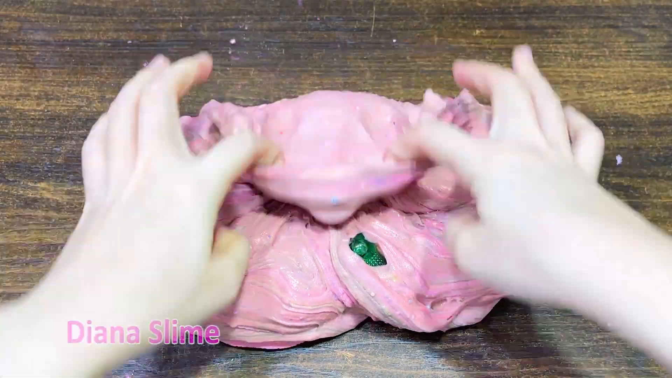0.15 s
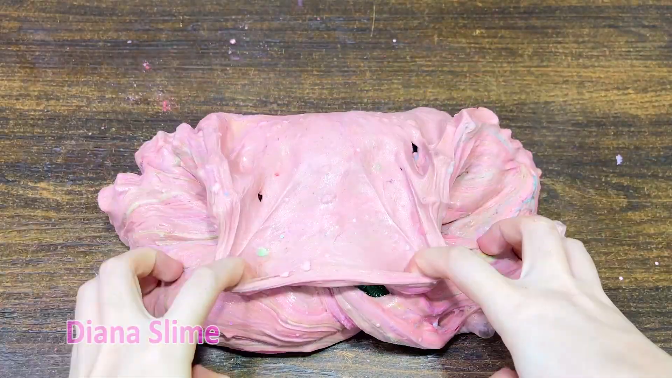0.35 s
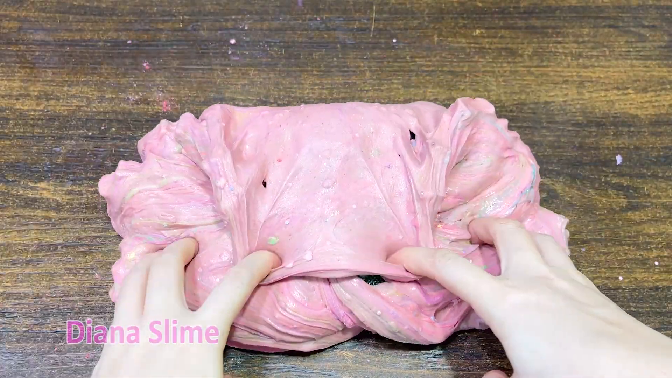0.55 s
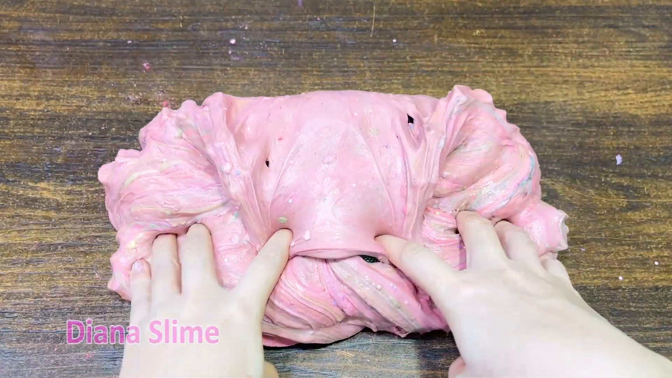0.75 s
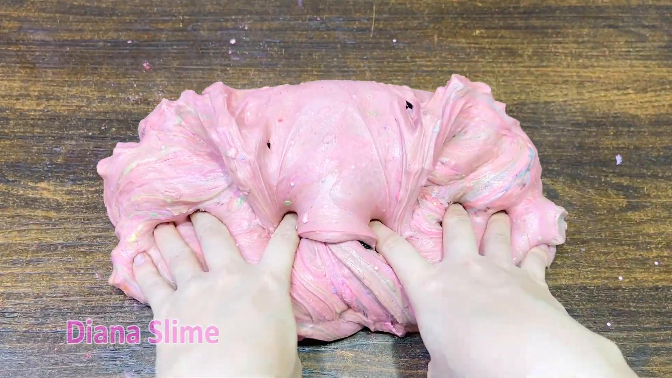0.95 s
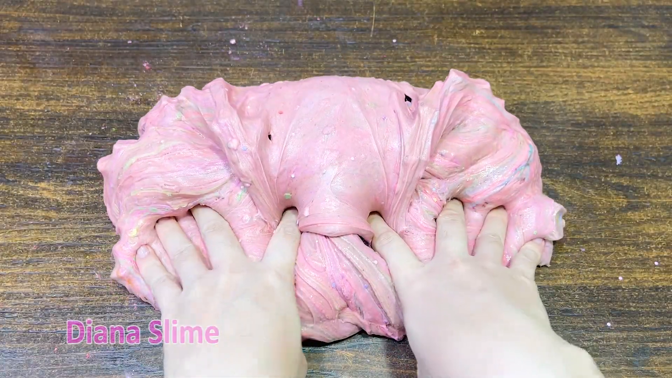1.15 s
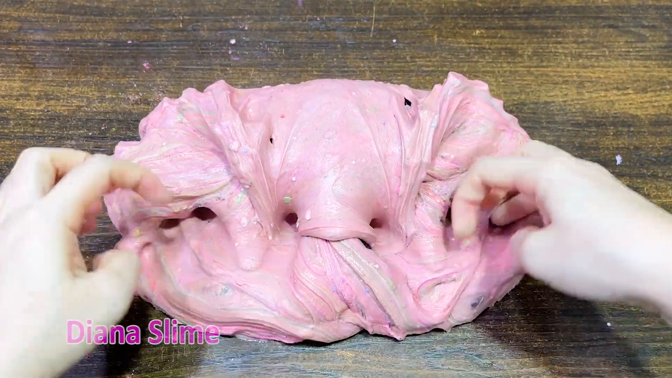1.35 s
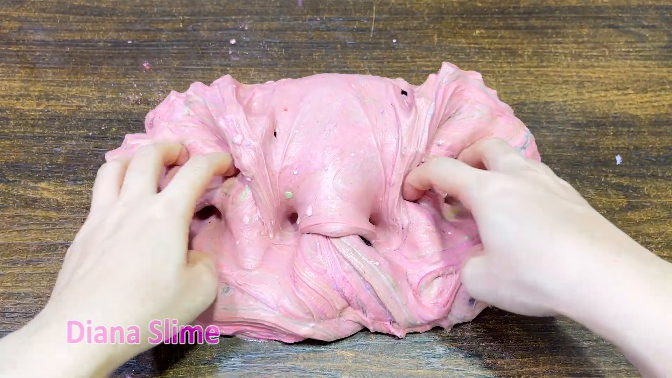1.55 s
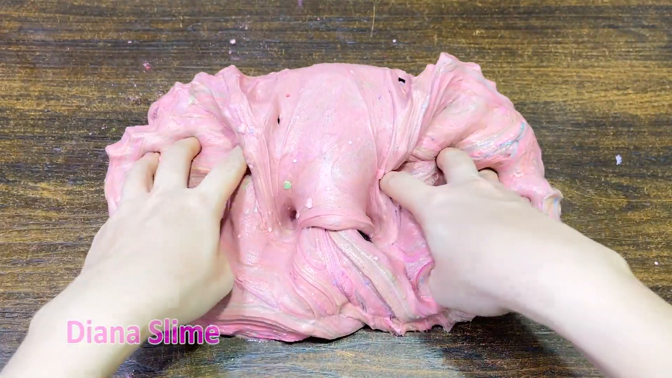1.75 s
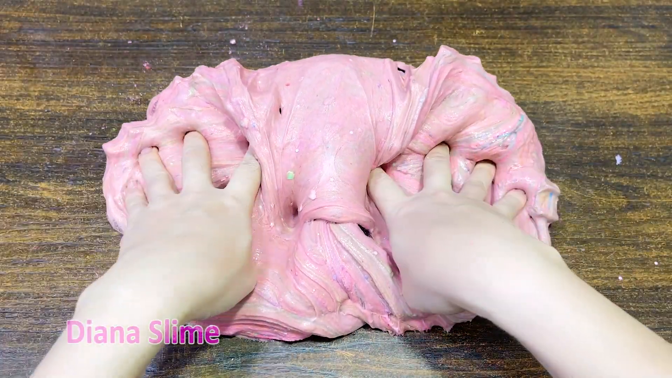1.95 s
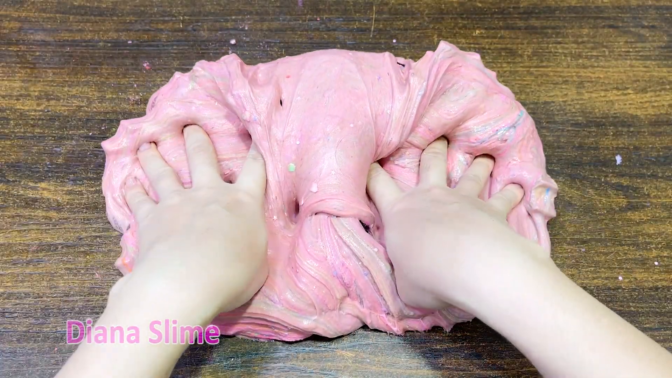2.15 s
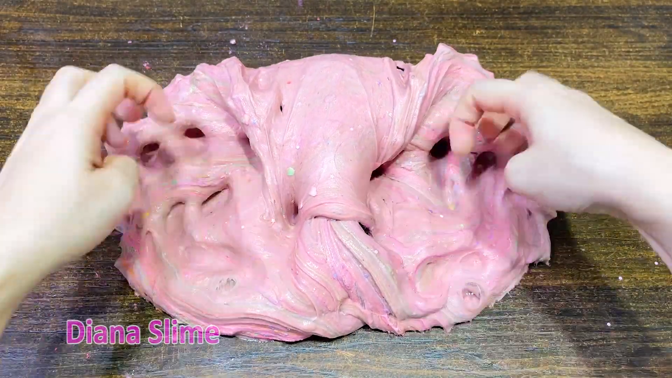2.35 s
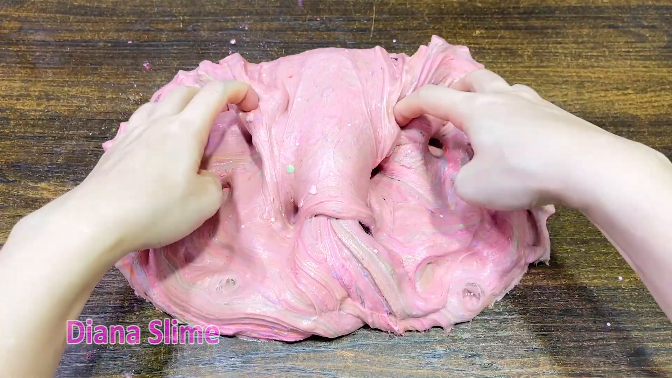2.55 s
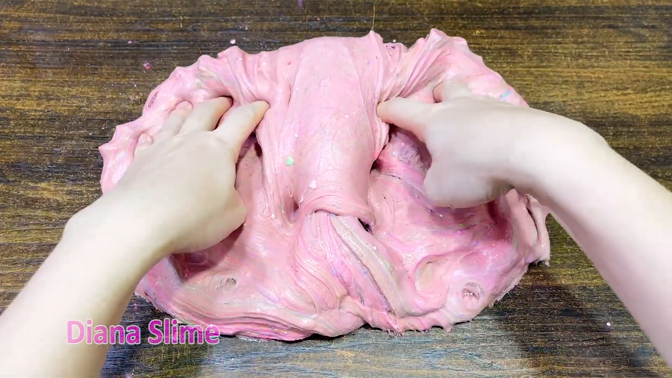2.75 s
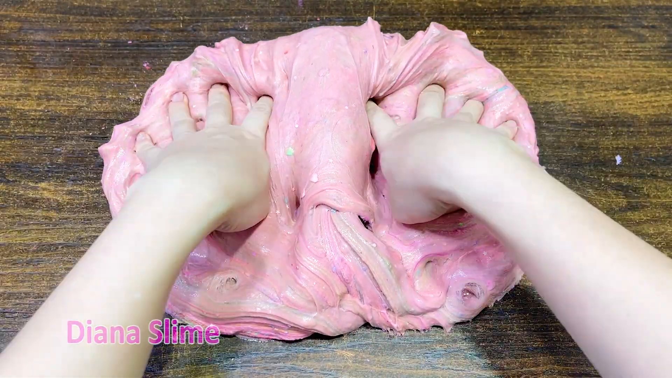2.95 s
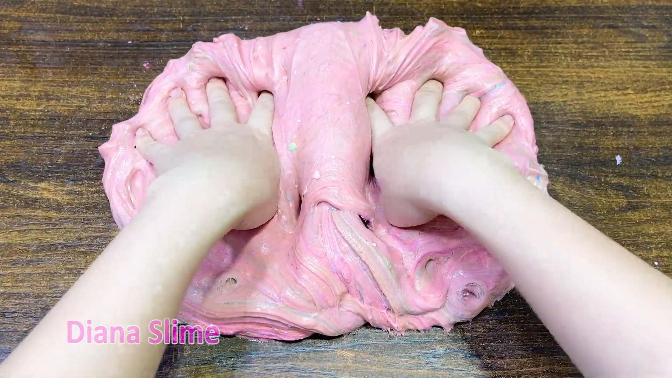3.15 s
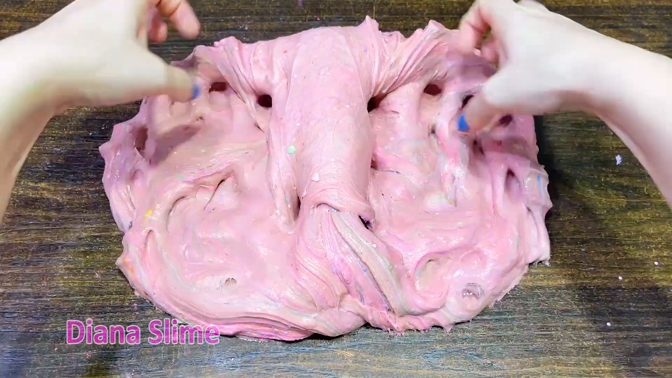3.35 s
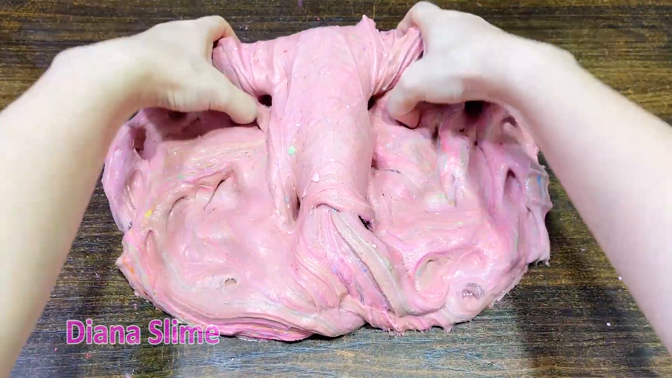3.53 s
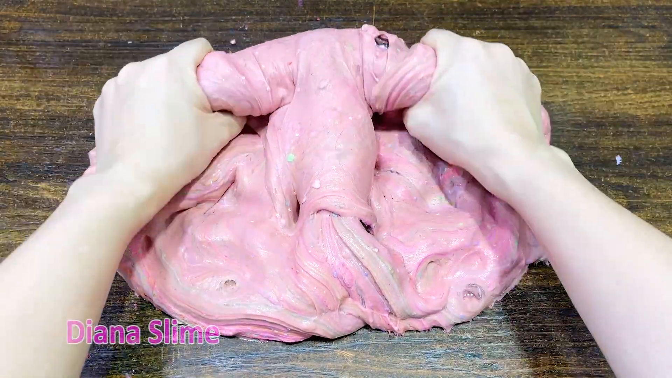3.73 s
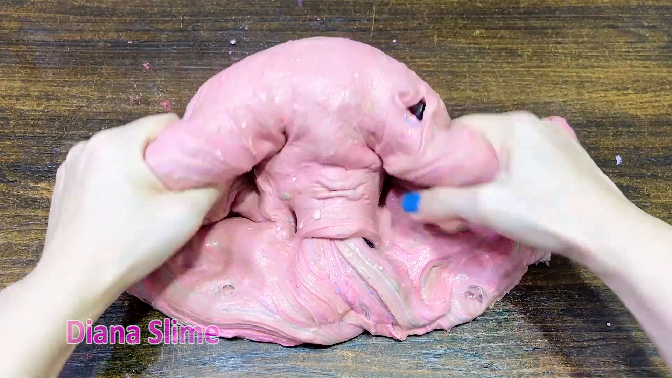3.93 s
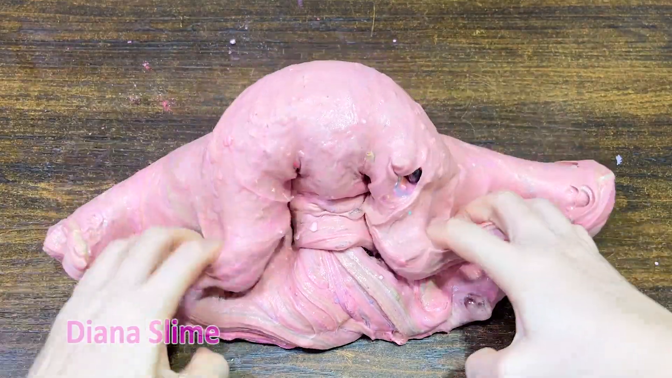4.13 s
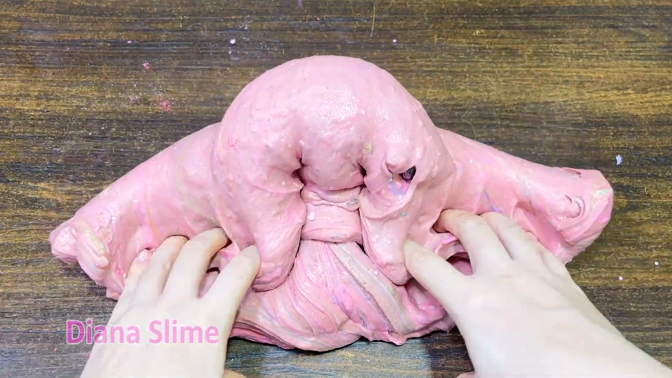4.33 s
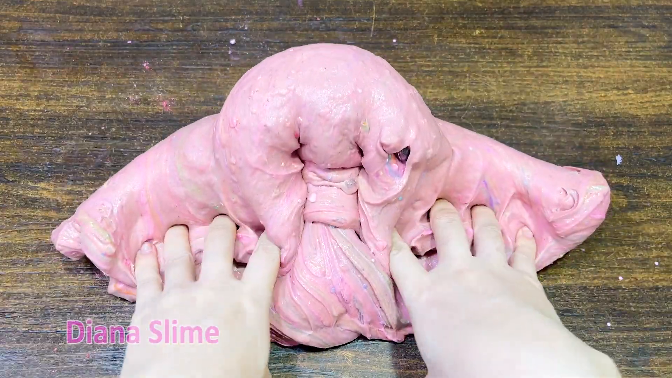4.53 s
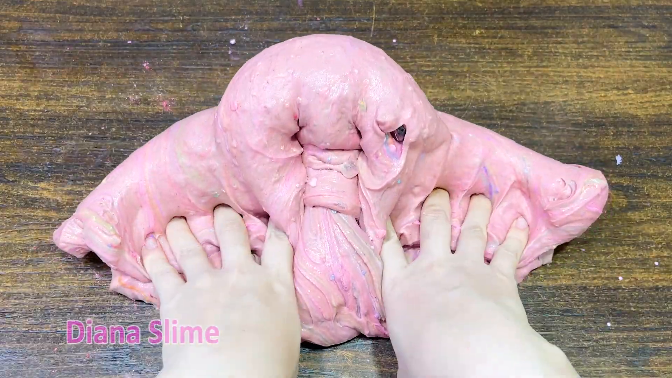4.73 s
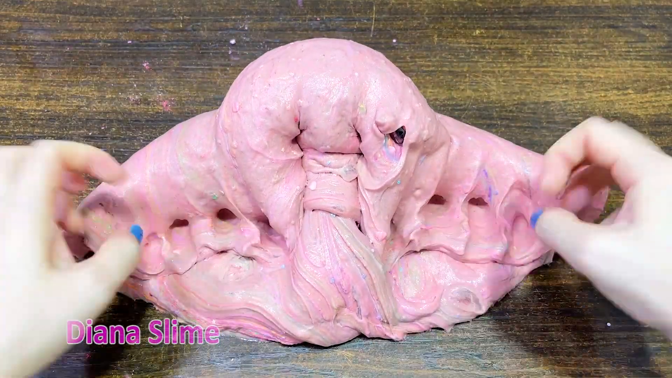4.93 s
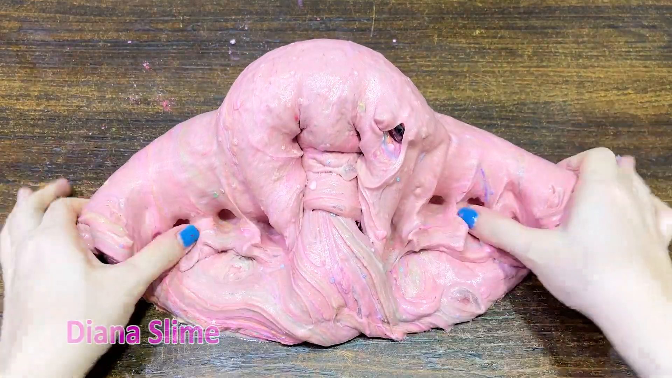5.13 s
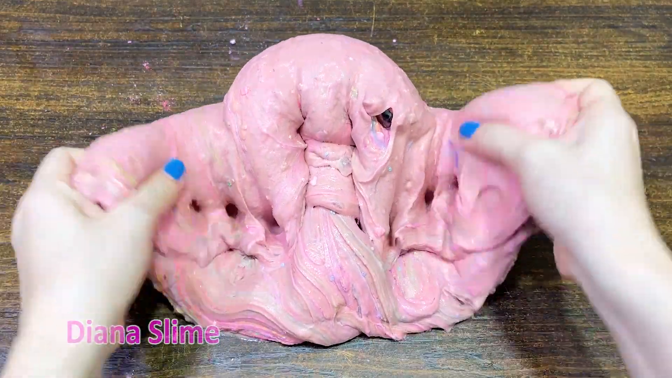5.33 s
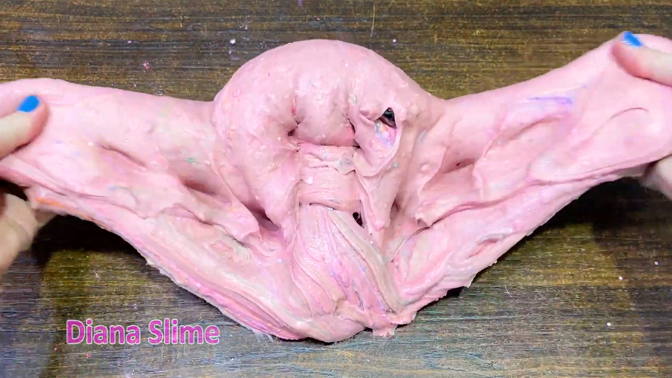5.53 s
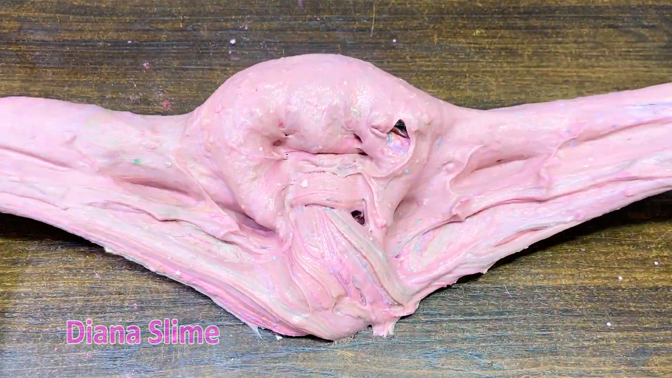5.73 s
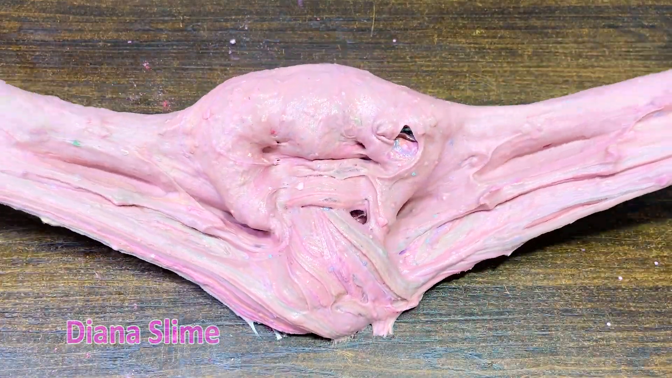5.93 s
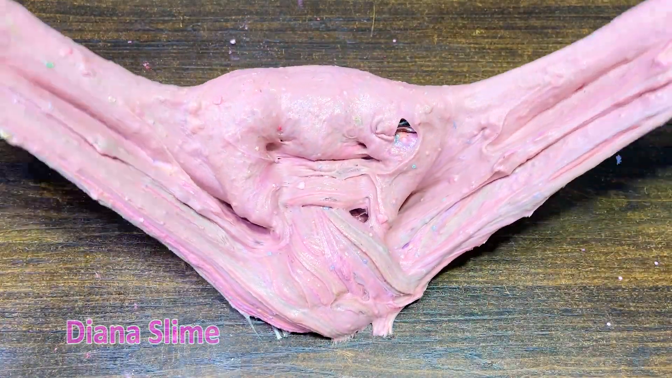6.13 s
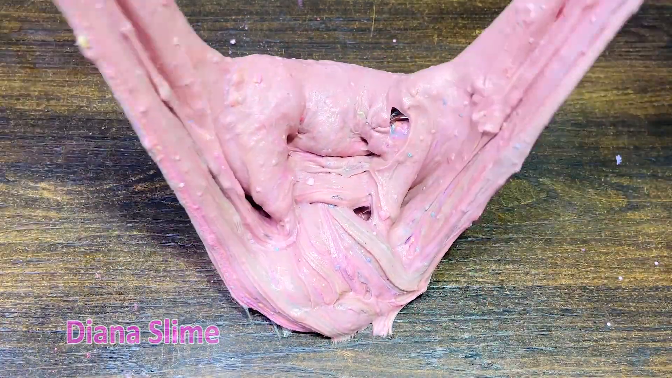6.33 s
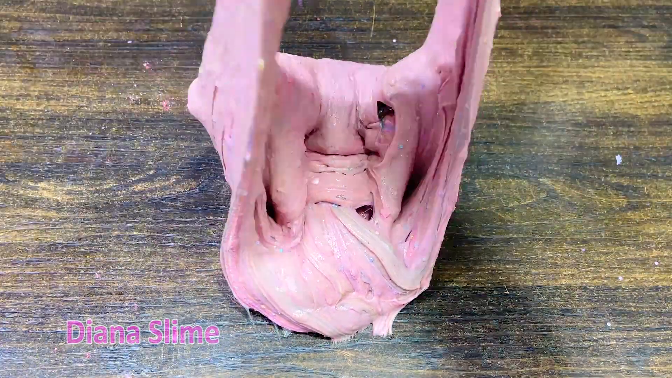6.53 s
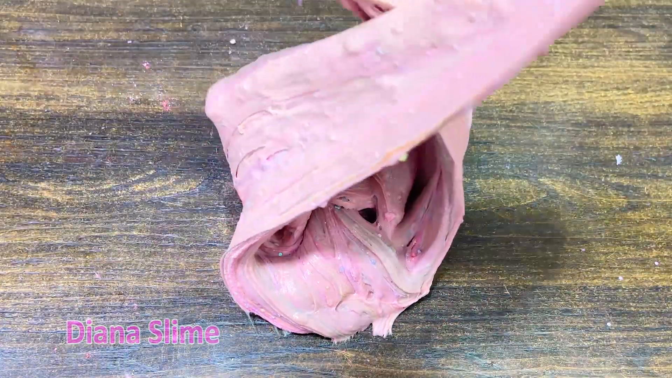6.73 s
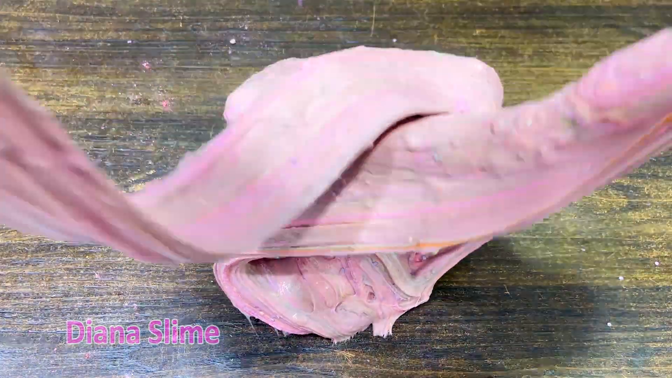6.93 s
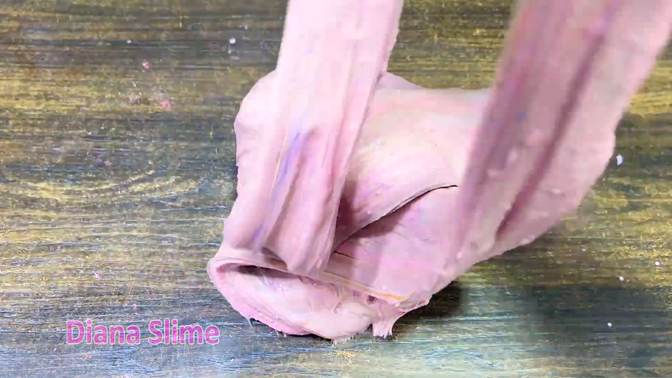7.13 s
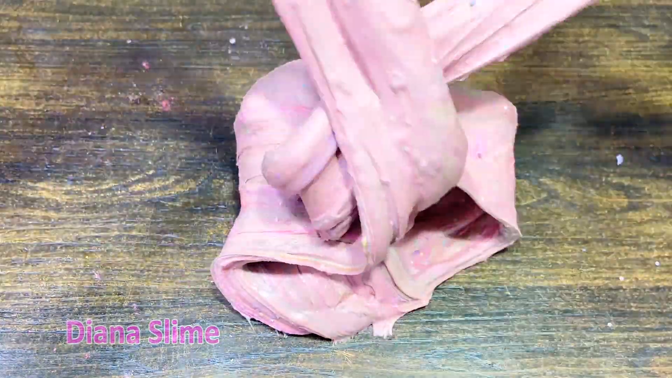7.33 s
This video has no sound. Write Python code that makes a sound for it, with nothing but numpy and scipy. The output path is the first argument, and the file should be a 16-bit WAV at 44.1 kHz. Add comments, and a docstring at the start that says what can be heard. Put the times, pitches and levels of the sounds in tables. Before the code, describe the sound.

Close, crisp slime sounds: bursts of sticky crackling and bubble pops as fingers press and pull, quieter squishing between, over a faint room hum.

```python
"""Two hands press, fold and stretch a soft sticky mass on a wooden table in a small quiet room.
From the start thin films tear in a fine crackle of short rings, single films snap as puffs of noise and
air pockets pop as decaying tones; three stronger bursts between 1.3 and 3.5 s and one at 5 s add the gulps
of closing finger holes and thuds of the table, as noise bands. Longer strains crackle near 4.1 and 5.5 s,
then weaken, and a low-mid rush swells at 7.3 s. A fan-like hum, coloured noise, lies below throughout."""
import sys
import numpy as np
from scipy import signal
from scipy.fft import rfft, irfft, next_fast_len
from scipy.io import wavfile

SR = 44100
rng = np.random.default_rng(int(sys.argv[2]) if len(sys.argv) > 2 else 0)


def gain_from_db(level_db):
    """Convert decibel levels to linear amplitude factors (20 dB per decade)."""
    decades = np.asarray(level_db, float) / 20
    return 10 ** decades


def generate_wav(signal):
    """Clip the signal to [-1, 1] and save it as 16-bit WAV at the path in sys.argv[1]."""
    frames = np.transpose(np.atleast_2d(signal))
    scaled = np.clip(frames, -1, 1) * 32767
    pcm = np.round(scaled).astype(np.int16)
    wavfile.write(sys.argv[1], SR, pcm)


N = 329868


def rms_one(x):
    """Normalisation: scale to unit root mean square."""
    return x / np.sqrt(np.mean(x ** 2) + 1e-20)


def in_time(rows):
    """Linear interpolation: the value of each column at every sample."""
    s, *columns = np.transpose(rows)
    return [np.interp(np.arange(N) / SR, s, column) for column in columns]


def shaped(x, points):
    """Linear filtering: gains in dB, interpolated on a log frequency axis, multiply the spectrum."""
    hz, db = np.transpose(points)
    grid = np.maximum(np.fft.rfftfreq(N, 1 / SR), 1)
    gain_db = np.interp(np.log(grid), np.log(hz), db, -90, -90)
    return irfft(rfft(x) * gain_from_db(gain_db), N)


def drift(corner_hz):
    """Low-pass random process: two equal poles leave slow fluctuations of unit spread."""
    hop = 40  # samples between computed values
    warm_up = 2000
    r = np.exp(-2 * np.pi * corner_hz * hop / SR)
    white = rng.standard_normal(N // hop + warm_up + 2)
    slow = signal.lfilter([1], [1, -2 * r, r * r], white)[warm_up:]
    return np.interp(np.arange(N) / hop, np.arange(len(slow)), rms_one(slow))


def resonator(x, hz, r, gain):
    """Damped resonance: a pole pair of radius r rings at hz, with zeros at both ends of the spectrum."""
    w = 2 * np.pi * hz / SR
    return signal.lfilter([gain, 0, -gain], [1, -2 * r * np.cos(w), r * r], x)


def band_noise(low_hz, high_hz, alike):
    """Partial coherence: mid and side noise in one band, weighted by likeness, with rms 1."""
    sos = signal.butter(2, [low_hz, high_hz], "band", fs=SR, output="sos")
    mid, side = signal.sosfilt(sos, rng.standard_normal((2, N)))
    return rms_one(np.sqrt(1 + alike) * mid + np.sqrt(1 - alike) * side * [[1], [-1]])


def high_pass(x, order, hz):
    """High-pass filtering: a maximally flat response removes the bass."""
    return signal.sosfilt(signal.butter(order, hz, "high", fs=SR, output="sos"), x)


def humps(s, hold_s, db, rise_db_per_s, fall_db_per_s, under_db, swell_db_per_s=0.0):
    """Power addition: events that rise, swell through a hold and fall, straight in dB, add to a level."""
    power, t = 0, np.arange(0, N / SR + .001, .001)
    for start, hold, top in np.broadcast(s, hold_s, db):
        rise = rise_db_per_s * np.maximum(start - t, 0)
        swell = swell_db_per_s * np.clip(start + hold - t, 0, hold)
        fall = fall_db_per_s * np.maximum(t - start - hold, 0)
        power = power + gain_from_db(2 * np.maximum(top - rise - fall - swell, -150))
    return 10 * np.log10(gain_from_db(2 * under_db) + np.interp(np.arange(N) / SR, t, power))


def add(out, s, db, shape):
    """Superposition: place a shape so that its peak height is db."""
    i = int(s * SR)
    out[i:i + len(shape)] += (gain_from_db(db) * shape / np.abs(shape).max())[:N - i]


# typical pitch of the air pockets under the fingers: [t/s, f/Hz]
POCKET_PITCH = [(0, 2200), (.15, 1498), (.35, 3495), (.62, 2170), (1.1, 3826), (1.65, 2000), (2.2, 2594),
                (2.44, 1835), (3.0, 3190), (3.4, 3500), (3.7, 2000), (4.1, 1495), (4.4, 3427), (5.0, 3020),
                (5.35, 1894), (5.7, 3250), (6.5, 2977), (7.48, 2870)]


def crackle(db, colour, pitches, per_s, spread_db, clump_db, cycles, lean_db=0):
    """Shot noise: random tiny tears ring briefly at their own pitches, denser as peeling gets harder.

    Each pitch range comes and goes in patches; lean_db makes those near the pocket size stand out.
    """
    # per_s holds at -63 dB, before clumping and the limits
    rate = np.clip(per_s * gain_from_db(db + 63.0 + clump_db * drift(25)), 3000, 14000)
    sizes = gain_from_db(spread_db * np.minimum(rng.exponential(1, (2, N)), 5)) * rng.choice([-1, 1], (2, N))
    # the root keeps the mean power independent of the rate
    tears = sizes * (rng.random((2, N)) < rate / SR) / np.sqrt(rate)
    dealt = rng.integers(0, len(pitches), (2, N))
    pocket_hz, = in_time(POCKET_PITCH)
    rings = 0
    for k, hz in enumerate(pitches):
        r = np.exp(-hz / (cycles * SR))
        nearness = np.exp(-(np.log2(hz / pocket_hz) / 0.36) ** 2)  # width in octaves
        patch = gain_from_db(2.8 * drift(13.0) + lean_db * nearness)
        # a tiny offset keeps the filter clear of denormal numbers
        rings = rings + resonator(tears * (dealt == k) * patch + 1e-18, hz, r, 1 - r)
    near, apart = shaped(rings, colour)
    # tears far to the sides reach the ports unlike, and duller
    apart = signal.sosfilt(signal.butter(4, 9500, fs=SR, output="sos"), apart)
    return gain_from_db(db + 1.1 * drift(32)) * rms_one(near + 0.49 * apart * [[1], [-1]])


# colour of the fine tearing: [f/Hz, gain level/dB]
FINE_COLOUR = [(3500, -5.5), (5500, -3.5), (8000, -5.5), (10800, -2), (13800, 5), (15300, 4.5),
               (15950, -12.5)]
# colour of the wet body of the tearing: [f/Hz, gain level/dB]
BODY_COLOUR = [(500, -10.5), (900, -4), (1200, -10.5), (1600, -0.5), (2500, -4.5), (3800, -1), (6000, -24)]
# fingers pulled out of the mass: [t/s of full tearing, hold t/s,
# fine crackle level/dB and wet body level/dB, both at the end of the hold]
FINGER_PULLS = [(.1, .055, -27.5, -28.5), (0.179, .04, -36, -42.5), (1.367, 0.084, -27, -31),
                (2.375, 0.064, -29.5, -32), (2.399, .01, -25.5, -39), (3.366, 0.03, -23, -25.5),
                (4.948, .04, -37, -42), (5.009, 0.005, -19, -24.5)]
# slow strain while the mass is pressed, folded and stretched:
# [t/s, fine crackle level/dB, wet body level/dB]
SLOW_STRAIN = [(0.0, -49, -63), (.27, -55, -61), (.36, -49.5, -54.5), (.6, -61, -75.5), (.83, -72.5, -83),
               (1.08, -60, -66.5), (1.25, -74.5, -87.5), (1.68, -65, -63), (1.81, -65, -79),
               (2.03, -62, -62.5), (2.3, -77, -80), (2.66, -64, -68), (3.06, -61, -73.5),
               (3.21, -79.5, -79), (3.616, -67, -71), (3.654, -49.5, -49.5), (4.04, -39, -47),
               (4.11, -32.5, -43), (4.24, -48.5, -58), (4.49, -67.5, -75), (4.72, -60, -74.5),
               (4.89, -81, -91), (5.23, -64, -60.5), (5.25, -49, -47), (5.507, -32, -39.5),
               (5.545, -33.5, -43.5), (5.62, -50, -58.5), (5.84, -49, -56.5), (6.2, -55, -63),
               (6.355, -49, -66.5), (6.44, -55.5, -64.5), (6.507, -43.5, -53), (6.617, -73.5, -89.5),
               (7.33, -79, -81.5), (7.39, -71, -66.5), (7.48, -60.5, -68.5)]


def tearing():
    """Adhesive failure: pulls and slow strain set the levels of a fine and a wet crackle."""
    strain_fine_db, strain_body_db = in_time(SLOW_STRAIN)
    s, hold_s, pull_fine_db, pull_body_db = np.transpose(FINGER_PULLS)
    fine_db = humps(s, hold_s, pull_fine_db, rise_db_per_s=602.5, fall_db_per_s=336.5,
                    under_db=strain_fine_db, swell_db_per_s=59)
    body_db = humps(s, hold_s, pull_body_db, rise_db_per_s=603, fall_db_per_s=341,
                    under_db=strain_body_db, swell_db_per_s=132.5)
    fine = crackle(fine_db, FINE_COLOUR, np.geomspace(4000, 15500, num=9),
                   per_s=2200, spread_db=3.0, clump_db=3.5, cycles=1.8)
    body = crackle(body_db, BODY_COLOUR, np.geomspace(600, 5500, num=12),
                   per_s=5300, spread_db=3.0, clump_db=5.0, cycles=1.6, lean_db=4.5)
    return fine + body


# films snapping: [t/s, peak level/dB, centre f/Hz of the hiss]
FILM_SNAPS = [(0.021, -33.5, 10100), (.0964, -11.5, 14700), (.188, -19, 6960), (.202, -22.5, 7600),
              (.216, -22, 7260), (.2971, -35, 11600), (0.3152, -27, 12300), (0.4131, -21.5, 10200),
              (0.5684, -37, 11700), (.749, -30.5, 6450), (1.0203, -37.5, 11900), (1.3682, -25, 14700),
              (1.4389, -1.5, 12300), (1.4436, -9.5, 11600), (1.4638, -18, 14910), (1.7312, -36, 11700),
              (1.8237, -21, 7000), (1.9316, -20.5, 12200), (2.0248, -31.5, 7950), (2.059, -35, 15200),
              (2.1134, -34, 11600), (2.1958, -28, 8900), (2.3867, -6, 12600), (2.4055, -7.5, 11800),
              (2.435, -16, 14500), (2.5814, -43, 5920), (2.6039, -30.5, 14200), (2.6424, -38, 6100),
              (2.6648, -27.5, 14300), (2.74, -34.5, 14800), (2.868, -37, 14200), (2.9107, -22.5, 11800),
              (3.0304, -28, 14500), (3.062, -31.5, 11700), (3.3772, -12, 14500), (3.6426, -33, 10500),
              (3.6543, -30, 5470), (3.7853, -28.5, 9660), (3.8275, -20.5, 9000), (3.8361, -20.5, 11600),
              (4.2147, -21.5, 4830), (4.2664, -18, 8000), (4.4153, -31.5, 5000), (4.531, -43, 14500),
              (4.659, -28.5, 14200), (4.781, -32.5, 14300), (4.9679, -20, 7700), (5.005, -6, 10000),
              (5.0136, -7, 10800), (5.1985, -38, 9900), (5.2393, -33, 5100), (5.2544, -22, 11600),
              (5.3134, -24.5, 11600), (5.3401, -20, 14800), (5.437, -22, 11600), (5.4955, -11.5, 14100),
              (5.5045, -4.5, 15100), (5.5428, -18, 11500), (5.671, -28.5, 11700), (5.8344, -17, 8830),
              (5.856, -27, 7140), (5.955, -35, 6000), (6.247, -37, 7240), (6.971, -42.5, 14320),
              (7.125, -34.5, 14850)]


def snaps():
    """Impulsive rupture: a bursting film gives a short bright puff of noise, longer when louder."""
    out, t = np.zeros(N), np.arange(1200) / SR
    puffs = rng.standard_normal((len(FILM_SNAPS), len(t)))
    r = np.exp(-np.pi * 1900 / SR)  # bandwidth 1900 Hz
    for (s, db, hz), puff in zip(FILM_SNAPS, puffs):
        tail_s = .00042 + .0022 * gain_from_db(.9 * db)
        puff = puff * (1 - np.exp(-t / .0003)) ** 2 * np.exp(-t / tail_s)
        hiss = resonator(puff, hz, r, (1 - r * r) / 2)
        broad = signal.lfilter([1, -1], [1, -.2], puff)
        add(out, s, db, hiss + .22 * broad)
    return out


def cavities(rows, swell, cycles, rise, rough):
    """Cavity resonance: enclosed air swells, rings down unevenly and shifts in pitch as it closes.

    swell and cycles are time constants in periods; rise bends the pitch and rough jitters the phase.
    """
    out, wobbles = np.zeros(N), rng.standard_normal((len(rows), 42))
    for (s, db, hz), wobble in zip(rows, wobbles):
        turns = np.arange(int(20 / hz * SR)) * hz / SR
        body = (1 - np.exp(-turns / swell)) ** 2 * np.exp(-turns / cycles)
        jitter = rough * np.interp(2 * turns, np.arange(42), wobble)
        phase = turns * (1 + rise * (turns - 2)) + jitter
        add(out, s, db, body * np.sin(2 * np.pi * phase))
    return out


# air pockets popping: [t/s, peak level/dB before filter and trim, pocket f/Hz]
POCKET_POPS = [(.1049, -17, 3240), (.11, -16, 3500), (.1243, -16.5, 2870), (.145, -24, 1480),
               (.1541, -18.5, 3300), (.2162, -26, 3110), (.3155, -31, 3060), (.3555, -34, 5000),
               (.3614, -31.5, 3700), (.3673, -33.5, 4000), (.4132, -31, 4260), (.4563, -38.5, 2250),
               (.4843, -17.5, 3900), (.4846, -35.5, 1340), (.5608, -44.5, 1710), (.612, -33, 2180),
               (.6241, -33, 2160), (.6567, -40.5, 2170), (.7498, -25.5, 4220), (1.0188, -38.5, 3830),
               (1.052, -34.5, 4250), (1.0812, -29.5, 4070), (1.1662, -43.5, 4100), (1.392, -18.5, 3915),
               (1.4086, -14, 4500), (1.4419, -5, 4090), (1.4521, -15, 1550), (1.4913, -22, 4210),
               (1.5709, -42.5, 1930), (1.6332, -41.5, 1970), (1.6684, -41, 2100), (1.6831, -42, 2000),
               (2.0163, -38.5, 1490), (2.0255, -37.5, 2070), (2.1135, -38, 2016), (2.1955, -21.5, 3190),
               (2.1952, -11.5, 2170), (2.4348, -14.5, 1790), (2.4352, -31, 940), (2.4423, -19, 1770),
               (2.642, -43, 1930), (2.7064, -50, 1580), (2.74, -42, 1980), (2.7452, -39.5, 3470),
               (3.0624, -42, 4030), (3.3717, -15, 4500), (3.3767, -11, 4200), (3.4006, -5.5, 2700),
               (3.4105, -18, 876), (3.4148, -15.5, 3330), (3.6534, -33.5, 2610), (3.7479, -33, 1620),
               (3.9254, -25, 3800), (4.2147, -35, 3960), (4.2665, -27.5, 4800), (4.3682, -35.5, 4640),
               (4.591, -44.5, 3320), (5.0077, -5, 4220), (5.0134, -11.5, 2950), (5.1978, -34.5, 2230),
               (5.2466, -36, 2540), (5.2543, -29.5, 1990), (5.3325, -28, 2478), (5.434, -29, 1900),
               (5.5049, -18.5, 4270), (5.7092, -30.5, 4900)]


def pops():
    """Small-source radiation: popping air pockets ring but radiate no bass."""
    rings = cavities(POCKET_POPS, swell=0.53, cycles=1.44, rise=0.006, rough=0.099)
    return gain_from_db(-2.0) * high_pass(rings, 2, 350)


# finger holes gulping shut: [t/s, peak level/dB before trim, cavity f/Hz]
HOLE_GULPS = [(0.1435, -40, 277), (0.4836, -40, 510), (1.3877, -19, 340), (1.402, -24, 310),
              (1.42, -17.5, 341), (1.4332, -26.5, 310), (1.464, -21.5, 330), (1.4916, -30.5, 270),
              (2.0157, -38, 478), (2.1948, -38, 361), (2.3899, -23, 300), (2.4043, -31, 342),
              (2.4308, -26, 315), (3.364, -34, 312), (3.3786, -19, 323), (3.3922, -24, 290),
              (3.4055, -22.5, 513), (3.4211, -28.5, 464), (3.6537, -48, 275), (4.9796, -18, 315),
              (4.9968, -23.5, 322), (5.0163, -14, 345), (5.037, -23.5, 269), (5.0503, -28, 290)]


def gulps():
    """Cavity resonance: finger holes ring low and fall in pitch as they gulp shut."""
    return gain_from_db(-4.5) * cavities(HOLE_GULPS, swell=0.79, cycles=1.26, rise=-0.0043, rough=0.019)


# table top: [f/Hz, level/dB, 60 dB decay t/s]
TABLE_TOP_MODES = [(263, -0.5, 0.55), (300, 0.5, 0.28), (440, -6.5, 0.33)]


def table_ring(x):
    """Modal vibration: the resonances of the table top ring on after each gulp."""
    out = 0
    for hz, db, t60_s in TABLE_TOP_MODES:
        r = gain_from_db(-60 / (t60_s * SR))
        out = out + gain_from_db(db) * resonator(x + 1e-18, hz, r, 1 - r)
    return out


# fingers sinking in or sheets drawn thin: [start t/s, end t/s, least tick peak level/dB]
FINGER_PRESSES = [(0.281, 1.2, -56), (1.55, 2.15, -52.5), (2.55, 3.119, -53.5), (3.701, 4.2, -43),
                  (4.278, 4.8, -55.5), (5.601, 6.4, -51.5)]


def ticks():
    """Poisson process: small pockets let go at random moments while the fingers sink in."""
    per_s, spread_db, low_hz, high_hz = 35.0, 3.0, 2000, 8000
    rows = []
    for start, end, db in FINGER_PRESSES:
        gap, size, pitch = np.transpose(rng.random((80, 3)))
        s = start + np.cumsum(-np.log(1 - gap) / per_s)
        peak_db = db - spread_db * np.log(1 - .98 * size)
        hz = low_hz * (high_hz / low_hz) ** pitch
        rows += list(np.transpose([s, peak_db, hz])[s < end])
    return cavities(rows, swell=.5, cycles=0.64, rise=0.0083, rough=0.13)


# the mass jolts the table: [t/s, rumble level/dB, boom level/dB, squelch of the mass level/dB before trim]
TABLE_JOLTS = [(.166, -55, -51.5, -42), (.493, -68, -76, -58), (1.42, -56, -52, -32),
               (2.023, -69, -69.5, -58), (2.207, -64.5, -65, -53), (2.433, -48.5, -49, -32.5),
               (3.41, -51.5, -47, -34.5), (3.658, -60.5, -50, -48.5), (4.119, -68, -65, -54),
               (5.022, -48.5, -50.5, -28), (5.47, -65, -60, -52.5), (6.735, -74, -72, -62),
               (6.995, -73, -53.5, -77.5), (7.398, -71, -63, -56)]


def jolt_levels():
    """Impact excitation: each jolt lifts rumble, boom and squelch above their resting levels."""
    s, rumble_db, boom_db, squelch_db = np.transpose(TABLE_JOLTS)
    rumble_lag_s = 0.015
    rumble_db = humps(s + rumble_lag_s, 0.057, rumble_db, rise_db_per_s=398.5, fall_db_per_s=120.5, under_db=-75.5)
    boom_db = humps(s, .03, boom_db, rise_db_per_s=298, fall_db_per_s=200.5, under_db=-79.5)
    squelch_db = humps(s, 0, squelch_db, rise_db_per_s=352.5, fall_db_per_s=280, under_db=-73)
    return rumble_db, boom_db, squelch_db


def squelch(squelch_db):
    """Amplitude modulation: the jolted mass squelches as low-mid noise of fluctuating level."""
    return gain_from_db(squelch_db - 4.5 + 4.1 * drift(30)) * band_noise(240, 460, alike=0.9)


def table_echo(x):
    """Reflection: the table returns one weaker copy 4.6 ms late."""
    return gain_from_db(-18) * np.roll(x, int(.0046 * SR), axis=1)


def table_thuds(rumble_db, boom_db):
    """Forced vibration: the jolted table sounds as a fluctuating rumble and a boom above it."""
    rumble = gain_from_db(rumble_db + 3.6 * drift(7.7)) * band_noise(56, 83.6, alike=.97)
    return rumble + gain_from_db(boom_db) * band_noise(120, 160, alike=.9)


# low-mid rush: [t/s, level/dB]
RUSH_LEVEL = [(0.0, -63.5), (1.3, -65.5), (3.3, -67), (3.7, -67.5), (4.3, -65.5), (5.8, -65.5), (6.5, -72),
              (6.75, -61.5), (7.01, -69), (7.2, -65), (7.31, -51), (7.48, -59.5)]


def rush(squelch_db):
    """Band-limited noise: a low-mid rush follows its own level and swells with each squelch."""
    rush_db, = in_time(RUSH_LEVEL)
    return (gain_from_db(rush_db) + gain_from_db(squelch_db - 21)) * band_noise(627, 787, alike=0.43)


def room(x):
    """Reverberation: eight feedback delays a side, duller on every round."""
    t60_s, wall_cut_hz = .32, 11000  # decay time before the dulling; one-pole low-pass corner
    size = next_fast_len(N + SR)
    w = 2 * np.pi * np.fft.rfftfreq(size)
    dull = np.exp(-2 * np.pi * wall_cut_hz / SR)
    wall = (1 - dull) / (1 - dull * np.exp(-1j * w))
    out = np.zeros((2, len(w)), complex)
    for k, lag in enumerate((rng.uniform(.005, .03, 16) * SR).astype(int)):
        loop = gain_from_db(-60 * lag / SR / t60_s) * wall * np.exp(-1j * w * lag)
        out[k % 2] += loop / (1 - loop) * (-1) ** (k // 2)
    return irfft(out * rfft(x, size), size)[:, :N]


# colour of the room tone: [f/Hz, relative level/dB per Hz]
TONE_COLOUR = [(18, -44), (30, -29), (59, -12), (151, 2), (238, -11), (374, -3), (425, -9), (669, 1),
               (929, -15), (1540, -22), (6490, -31.5), (7940, -5.5), (9710, -26), (12500, -30),
               (16200, -53), (22000, -120)]
# likeness of the two ports in the room tone: [f/Hz, left-right correlation]
TONE_LIKENESS = [(60, 0.58), (240, 0.81), (950, 0.99), (3770, -0.15), (15000, -0.31)]


def room_tone():
    """Coherence of a noise field: steady hum and hiss agree in the bass and part in the treble."""
    hz, alike = np.transpose(TONE_LIKENESS)
    alike = np.pad(np.clip(alike, -.99, .99), 1, mode="edge")
    ends = [10, *hz, SR / 2]
    white = rng.standard_normal((2, N))
    mid = shaped(white[0], list(zip(ends, 10 * np.log10(1 + alike))))
    side = shaped(white[1], list(zip(ends, 10 * np.log10(1 - alike))))
    return gain_from_db(-64) * rms_one(shaped(mid + side * [[1], [-1]], TONE_COLOUR))


# phase between the microphone ports: [f/Hz, left lead/rad]
LEFT_LEAD = [(0, 0), (1500, .3), (3700, 1), (5600, .4), (8800, 0), (9800, .9), (11200, 0),
             (15600, -2 * np.pi)]
# balance of the microphone ports: [f/Hz, left minus right level/dB]
LEFT_EXCESS = [(200, 1.5), (1300, -0.7), (2400, 0.5), (4400, 3.5), (7000, 5), (11000, 1.1), (15000, -0.5)]


def ports(x):
    """Interference: the left port lags in the top octave, so the sum of both has a notch there."""
    grid = np.fft.rfftfreq(N, 1 / SR)
    tilt_db = np.interp(grid, *np.transpose(LEFT_EXCESS)) / 2
    lead = np.interp(grid, *np.transpose(LEFT_LEAD))
    return irfft(rfft(x) * [gain_from_db(tilt_db) * np.exp(1j * lead), gain_from_db(-tilt_db)], N)


def scene():
    """Superposition: the mass close below the ports, the table under it, the room around."""
    rumble_db, boom_db, squelch_db = jolt_levels()
    gulping = gulps()
    mass = tearing() + snaps() + pops() + gulping + table_ring(gulping)
    mass = mass + ticks() + squelch(squelch_db)
    mass = mass + table_echo(mass)
    mass = high_pass(mass, 3, 190)
    reverberation = gain_from_db(-27.5) * room(mass.mean(axis=0))
    table = table_thuds(rumble_db, boom_db)
    return ports(mass) + reverberation + table + rush(squelch_db) + room_tone()


def top_cut(x):
    """Nothing passes above the cut-off."""
    return signal.sosfilt(signal.butter(12, 16970, fs=SR, output="sos"), x)


def record(dry):
    """Band limitation: a steep low-pass takes 45 dB off the top from 16200 Hz up."""
    mix = signal.sosfilt(signal.cheby2(10, 45, 16200, fs=SR, output="sos"), dry)
    return top_cut(mix)


dry = scene()
out = record(dry)
generate_wav(out)
```